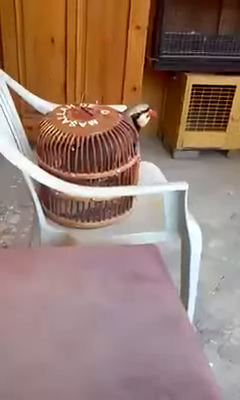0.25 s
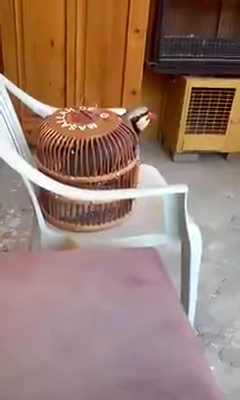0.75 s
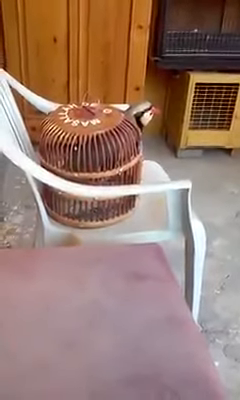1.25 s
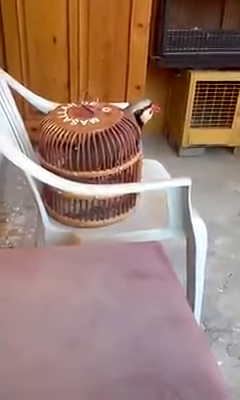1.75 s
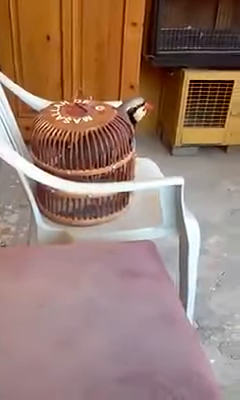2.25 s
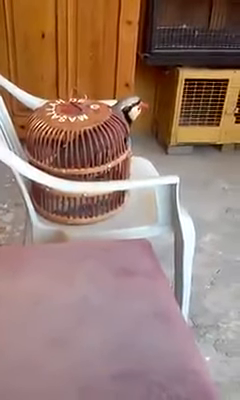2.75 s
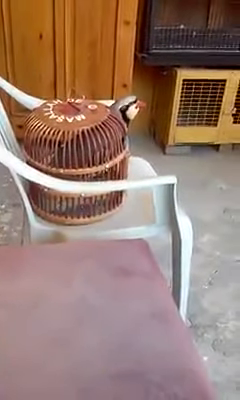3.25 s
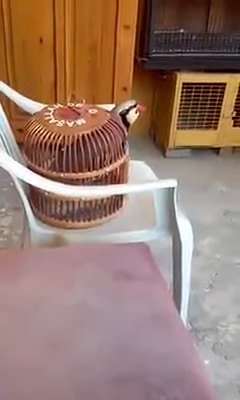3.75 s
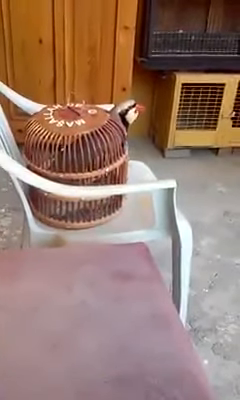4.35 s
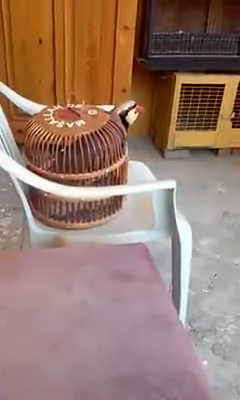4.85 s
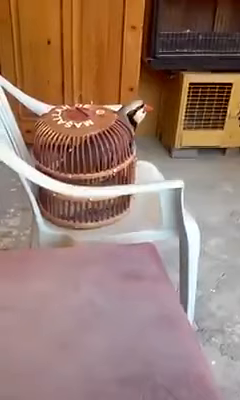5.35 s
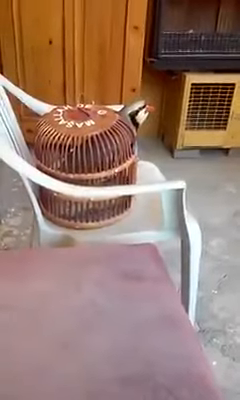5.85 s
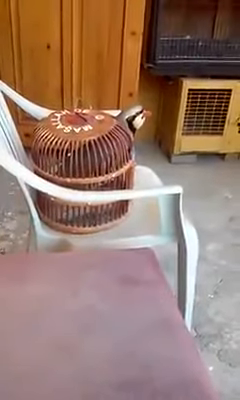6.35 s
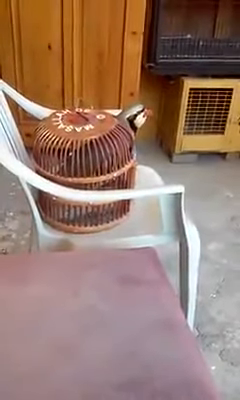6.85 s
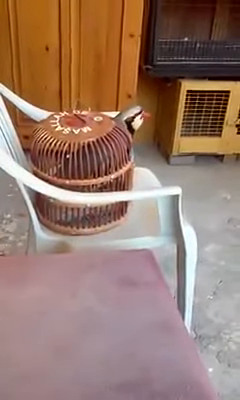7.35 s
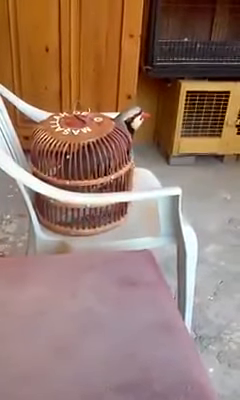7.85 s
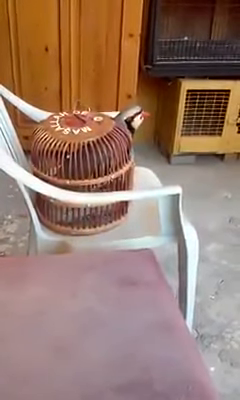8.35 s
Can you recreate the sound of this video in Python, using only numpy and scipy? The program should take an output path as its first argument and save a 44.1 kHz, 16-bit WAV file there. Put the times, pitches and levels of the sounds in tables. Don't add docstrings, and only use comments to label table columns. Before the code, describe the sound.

Mid-call opening after a brief silence: quick raspy chuks from a partridge, then a rolling pattern of chuk, quiet note and throaty roll. The bird breaks into a long even run of loud barking clucks, then finishes with two softer phrases. A hard courtyard adds slap and brief ring. A phone-like microphone suppresses the dull outdoor wash and distant idling engine; a faint crow precedes near silence.

```python
import sys
import numpy as np
from scipy import signal
from scipy.io import wavfile
from scipy.ndimage import uniform_filter1d

SR = 44100
rng = np.random.default_rng(int(sys.argv[2]) if len(sys.argv) > 2 else 0)


def unload_wav(signal):
    wavfile.write(
        sys.argv[1],
        SR,
        np.round(np.clip(np.atleast_2d(signal).T, -1, 1) * 32767).astype(np.int16),
    )


def volts_from_db(level):
    exponent = np.asarray(level, float) / 20
    return 10 ** exponent


N = 379392


def evened(x):
    return x / np.sqrt(np.mean(x ** 2) + 1e-20)


def read(points, hz):
    f, value = np.transpose(points)
    return np.interp(np.log(hz + 1), np.log(f + 1), value)


def curve(rows, t):
    s, *columns = np.transpose(rows)
    return [np.interp(t, s, c) for c in columns]


def add(mix, s, sound):
    part = mix[round(s * SR):][:len(sound)]
    part += sound[:len(part)]


def wander(count, hz):
    return evened(signal.lfilter([1], [1, -np.exp(-2 * np.pi * hz / SR)], rng.standard_normal(count)))


def partridge():
    # start in seconds, level in dB, beak opening as a factor, length in seconds.
    cut_in = (.166, -13, .93, .055)
    chuks = [(0.293, -10, 0.93, 0.054), (0.43, -11, .92, 0.041), (0.566, -11, 0.9, 0.043),
             (0.702, -10, .88, 0.05), (.842, -8.5, 0.96, 0.046), (0.977, -9.5, .95, .05),
             (1.431, -11.5, 0.96, 0.047), (1.92, -8, 0.96, 0.06), (2.395, -11, 0.95, 0.06),
             (2.89, -13, 0.87, 0.051), (3.384, -10, .95, 0.04), (3.898, -9.5, 0.98, 0.055),
             (4.055, -8, 0.92, 0.058), (6.876, -7.5, 0.98, 0.065), (7.015, -10, 0.91, 0.055),
             (7.363, -8, 1, 0.053)]
    run = [(4.508, -8.5, 0.99, 0.07), (4.656, -8, 0.97, 0.067), (4.812, -7, 0.96, 0.054),
           (4.966, -7.5, 1, 0.053), (5.12, -8, 0.97, .049), (5.272, -8.5, 0.95, 0.044),
           (5.426, -9, 0.93, 0.05), (5.559, -7.5, 0.96, .037), (5.701, -9.5, .95, 0.064),
           (5.84, -9, 0.96, 0.046), (5.986, -9.5, 0.9, .052), (6.136, -8, 0.92, 0.046),
           (6.281, -7.5, 0.93, 0.057), (6.406, -8, .94, 0.054), (6.546, -6, 0.93, 0.049),
           (6.677, -9.5, 0.96, 0.057)]
    steady = [(1.109, -26.5, 0.95, 0.065), (1.241, -31, .79, .035), (1.559, -22, 0.84, 0.057),
              (1.688, -28.5, 0.9, .049), (2.06, -21, 0.86, 0.066), (2.184, -27.5, 0.78, 0.056),
              (2.53, -20.5, 0.89, 0.08), (2.656, -26, 0.81, 0.066), (3.026, -22, 0.87, 0.055),
              (3.156, -27.5, .9, .032), (3.535, -20.5, 0.88, 0.061), (3.664, -28, .94, 0.051),
              (4.207, -20.5, 0.92, 0.062), (4.327, -22.5, 0.88, 0.043), (7.152, -24, 0.87, 0.046),
              (7.495, -21, 0.88, 0.072), (7.622, -24.5, 0.84, 0.065)]
    rolls = [(1.268, -17, 0.95, .039), (1.738, -19, 0.94, 0.068), (2.211, -22, 0.89, 0.078),
             (2.703, -20.5, 0.97, .06), (3.194, -20, 0.97, 0.043), (3.706, -22, 0.92, .06),
             (4.342, -19.5, 0.96, 0.049), (7.194, -17.5, 0.87, 0.039), (7.666, -17.5, 0.99, 0.054)]
    # frequency in Hz, gain in dB.
    wide_open = [(170, -58), (230, -27), (310, -11), (423, -20), (577, -15.5), (850, -12.5), (1200, 6.5),
                 (1410, 0.5), (1860, -32), (2300, -20)]
    half_open = [(170, -57), (230, -27.5), (310, -15.5), (439, -9.5), (577, -19.5), (930, 4.5),
                 (1150, -6.5), (1500, -9.5), (1900, -24), (2300, -20.5)]
    nearly_shut = [(170, -59.5), (300, -19), (380, -15), (465, -5.5), (620, -10), (790, 10), (1060, -17),
                   (1470, 0), (1800, -12), (2300, -17.5)]
    rough = {"chuk": (.025, .4), "steady": (.045, .95), "roll": (.04, .7)}
    out = np.zeros(N)
    for row in [cut_in, *chuks, *run]:
        add(out, *note(row, wide_open, rough["chuk"], usual_hz=479.6, usual_db=-11.0, lead=0.0083,
                       rise=0.65, fall=0.46, bend=1.05, closing=0.07, rasp_db=0.0))
    for row in steady:
        add(out, *note(row, nearly_shut, rough["steady"], usual_hz=462.2, usual_db=-11.5, lead=0.0083,
                       rise=0.66, fall=0.12, bend=2.1, closing=0.087, rasp_db=4.5))
    for row in rolls:
        add(out, *note(row, half_open, rough["roll"], usual_hz=452.7, usual_db=-7.5, lead=0.0091,
                       rise=0.69, fall=0.45, bend=0.99, closing=0.023, rasp_db=-6.0))
    return volts_from_db(-14.5) * out


def note(row, lower, rough, usual_hz, usual_db, lead, rise, fall, bend, closing, rasp_db):
    # time in seconds, factor on the upper resonances, brightness in dB above 2.5 kHz.
    posture = [
        (.2, 1.04, -3),
        (1.0, 1.01, -1),
        (1.4, 0.99, 2.6),
        (4.4, 0.984, -0.25),
        (7.7, 0.97, 2.5),
    ]
    pitch_spread, bright_spread_db = 0.012, 1.0
    bright_db_per_opening, usual_opening = 20.5, 0.96
    neck_sink = 0.013
    s, db, mouth, length = row
    jitter, air_share = rough
    draws = rng.standard_normal((3, 6000))
    neck, bright_db = curve(posture, s)
    neck = neck + draws[2, -1] / 70
    bright_db = bright_db + usual_db + bright_spread_db * draws[1, -2]
    bright_db += bright_db_per_opening * (mouth - usual_opening)

    u = np.arange(round(length * SR)) / (length * SR)
    shake = evened(uniform_filter1d(draws[0], size=120))[:len(u)]
    start_hz = usual_hz * (1 + pitch_spread * draws[1, -1])
    glide = 1 - fall * u ** (bend + draws[0, -1] / 8)
    turns = np.cumsum(start_hz * glide * (1 + jitter * shake)) / SR

    partials = np.cos(2 * np.pi * np.arange(1, 16)[:, None] * turns)
    partials[:2] *= np.minimum(np.array([[0.25], [0.55]]) + 1.94 * u, 1.3)
    pulses = evened(partials.sum(0))
    puffs = evened((0.16 + np.exp(-(turns % 1) / 0.74)) * draws[1, :len(u)])
    slow = uniform_filter1d(uniform_filter1d(draws[2], size=110), size=110)
    flutter = volts_from_db(2.2 * evened(slow)[:len(u)])
    effort = np.sin(np.pi * u ** rise) ** 2
    voice = effort * flutter * (pulses + air_share * puffs)
    hiss = np.diff(puffs, prepend=0) * np.minimum(3.5 * u, 1)
    rasp = effort ** 2 * np.minimum(4 * u, 1) * flutter * (pulses + 1.2 * hiss)
    rasp *= volts_from_db(rasp_db + 1)

    wide, upper = tracts(lower, mouth * (1 + closing), neck * (1 + neck_sink), bright_db)
    narrow, sunk = tracts(lower, mouth * (1 - closing), neck * (1 - neck_sink), bright_db)
    low = signal.fftconvolve(voice * (1 - u), wide) + signal.fftconvolve(voice * u, narrow)
    high = signal.fftconvolve(rasp * (1 - u), upper) + signal.fftconvolve(rasp * u, sunk)
    return s - lead, volts_from_db(db) * evened(low + high)


def tracts(lower, mouth, neck, bright_db):
    # frequency in Hz, gain in dB.
    upper = [(2300, -49), (2700, -33.5), (3400, -13.5), (3880, -26.5), (4390, -11), (5100, -25.5),
             (5700, -44), (7000, -32.5), (8800, -33.5), (9900, -47), (11000, -37), (12600, -43.5),
             (13600, -58.5), (15000, -58)]
    hz = np.fft.rfftfreq(2048, 1 / SR)
    above_db = -10 * np.log10(1 + (2200 / (hz + 1)) ** 12)
    below_db = -10 * np.log10(1 + (hz / 2200) ** 12)
    low_db = read(lower, hz / mouth) + below_db
    high_db = read(upper, np.where(hz < 6500, hz / neck, hz)) + bright_db + 13.5 + above_db
    high_db += 13 * (mouth - 1) * (hz > 9500)
    return causal(low_db), causal(high_db)


def causal(db):
    log_gain = np.log(volts_from_db(np.r_[db, db[-2:0:-1]]))
    return np.fft.ifft(np.exp(np.conj(signal.hilbert(log_gain)))).real[:1024]


def fowl():
    # time in seconds, pitch in Hz, level in dB.
    crows = [
        [(7.7, 586, -31.5), (7.8, 572, -52), (7.88, 577, -52.5), (7.97, 570, -91)],
        [(7.93, 665, -69), (7.99, 708, -54.5), (8.07, 713, -67), (8.12, 685, -74), (8.18, 672, -77),
         (8.32, 667, -80.5)],
    ]
    harmonics = [
        [-36, -11, -5.5, -7.5],
        [-20, -0.5, 0.5, -35],
    ]
    out = np.zeros(N)
    for rows, levels in zip(crows, harmonics):
        t = np.arange(rows[0][0], rows[-1][0], 1 / SR)
        hz, db = curve(rows, t)
        turns = np.cumsum(hz * (1 + 0.017 * wander(len(t), 55))) / SR
        voice = sum(volts_from_db(o) * np.sin(2 * np.pi * k * turns) for k, o in enumerate(levels, 1))
        throb = (1 + 0.77 * np.sin(2 * np.pi * 62 * t)) * volts_from_db(1.6 * wander(len(t), 30.73))
        add(out, t[0], volts_from_db(db) * voice * throb * signal.windows.tukey(len(t), 0.1))
    return out


def yard(x, tail_db=2.0, late_db=-27, late_t60=0.41):
    # frequency in Hz, time to fall by 60 dB in seconds.
    t60 = [(250, 0.17), (700, 0.25), (1700, 0.24), (4600, 0.22), (12000, 0.13)]
    # frequency in Hz, gain in dB.
    wet = [(250, 10.5), (370, -12.5), (480, 8.5), (730, -4.5), (950, 4.5), (1250, -4.5), (2000, -1.5),
           (4400, -2.5), (8000, 0), (13000, -0.5)]
    # delay in seconds, level in dB.
    echoes = [(.0047, -34), (.0091, -11.5), (.0137, -9.5), (.021, -23), (.028, -12), (.043, -19.5)]
    taps = np.zeros(SR)
    at = np.arange(200, SR - 20, 20)
    taps[at + rng.integers(0, 20, len(at))] = rng.choice([-1., 1.], len(at))
    hz, t, z = signal.stft(taps, SR, nperseg=512)
    decay = volts_from_db(-60 * t / read(t60, hz)[:, None]) + volts_from_db(late_db - 60 * t / late_t60)
    tail = signal.istft(z * decay * volts_from_db(read(wet, hz))[:, None], SR, nperseg=512)[1]
    room = volts_from_db(tail_db) * tail / np.linalg.norm(tail)
    room[0] += 1
    for k, (s, db) in enumerate(echoes):
        room[round(s * SR)] += (-1) ** k * volts_from_db(db)
    return signal.fftconvolve(x, room)[:N]


def engine():
    # start in seconds, length in seconds, frequency in Hz, level in dB.
    drones = [(.1, 0.35, 120.8, -41.5), (.4, 0.71, 119.2, -39.5), (1.0, 0.44, 121.7, -56.5),
              (2.68, 0.32, 28.5, -49), (2.98, 0.26, 28.8, -47), (3.03, 0.28, 122, -47.5),
              (3.34, .15, 29, -52), (3.34, 0.24, 122, -49), (3.52, 0.25, 179, -52), (3.9, 0.45, 122, -57.5),
              (4.27, 0.17, 179, -52.5), (4.7, 0.33, 122, -56.5), (5.3, .3, 122, -56),
              (6.04, 0.3, 176, -46.5), (6.42, 0.15, 183, -44.5), (6.58, 0.34, 244, -45.5),
              (6.62, 0.3, 187, -51), (6.9, 0.23, 183, -49.5), (7.14, 0.3, 119.6, -50)]
    out = np.zeros(N)
    waver, throb = wander(N, 7.5), wander(N, 4.5)
    for s, length, hz, db in drones:
        span = slice(round(s * SR), round((s + length) * SR))
        turns = np.cumsum(hz * (1 + 0.01886 * waver[span])) / SR
        swell = signal.windows.tukey(len(turns), 0.57)
        swell = swell * volts_from_db(db + 1.6 * throb[span])
        add(out, s, swell * np.sin(2 * np.pi * turns))
    return out


def air(patchy_db=3.5, treble_follow=0.85, pump_db=2.5):
    # time in seconds, level in dB at 45-105 Hz.
    loudness = [(0.2, -54.5), (0.69, -56), (0.76, -56), (1.37, -64), (2.68, -65.5), (2.73, -56),
                (3.12, -61.5), (5.53, -58), (7.08, -59.5), (7.66, -58.5), (8.13, -82.5), (8.6, -79.5)]
    # frequency in Hz, level in dB.
    spectrum = [(12, -41.5), (25, -26.5), (60, -6), (133, -11.5), (254, -15), (355, -12), (916, -26.5),
                (3000, -22), (6000, -29.5), (14500, -36.5)]
    frames, hz = N // 256 + 5, np.fft.rfftfreq(1024, 1 / SR)
    a, b, patches = rng.standard_normal((frames, 513, 3)).T
    patches = evened(uniform_filter1d(uniform_filter1d(patches, size=6, axis=0), size=10, axis=1))
    level_db = curve(loudness, np.arange(frames) * 256 / SR)[0] + 88.5
    level_db = level_db + pump_db * evened(uniform_filter1d(rng.standard_normal(frames), size=14))
    follow = treble_follow + (1 - treble_follow) / (1 + (hz / 300) ** 2)
    gain_db = read(spectrum, hz)[:, None] + patchy_db * patches + np.outer(follow, level_db)
    wash = signal.istft((a + 1j * b) * volts_from_db(gain_db), nperseg=1024, noverlap=768)[1][:N]
    return volts_from_db(-75) * wash / np.std(wash[-SR // 4:])


def scene():
    return (yard(partridge() + volts_from_db(-6.5) * fowl()) + engine() + air())[None]


def thinned(x):
    hz, t, z = signal.stft(x, SR, nperseg=3072, noverlap=2304)
    size = uniform_filter1d(abs(z), size=3, axis=2)
    top = size.max(1, keepdims=True)
    thrift = uniform_filter1d(rng.standard_normal(z.shape), size=16, axis=1)
    thrift = evened(uniform_filter1d(thrift, size=4, axis=2))
    weak = size < volts_from_db(-31 + 6 * thrift) * top
    middle = ((hz > 1600) & (hz < 5200))[:, None]
    fading = top < np.roll(top, 1, axis=2)
    kept = np.where(weak & middle & fading, z / 20, z)
    return signal.istft(kept, SR, nperseg=3072, noverlap=2304)[1][:, :N]


def top_cut(x):
    return signal.sosfilt(signal.butter(12, 16550, fs=SR, output="sos"), x)


def record(dry):
    low_pass = signal.firwin(255, 15600, fs=SR)[None]
    dull = signal.oaconvolve(thinned(dry), low_pass, "same")
    start_s = 0.2
    return top_cut(dull * (np.arange(N) >= start_s * SR))


dry = scene()
out = record(dry)
unload_wav(out)
```